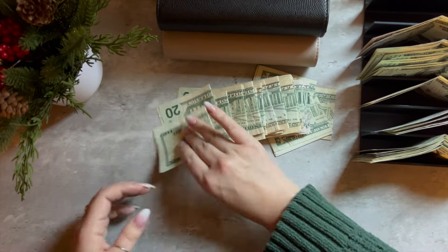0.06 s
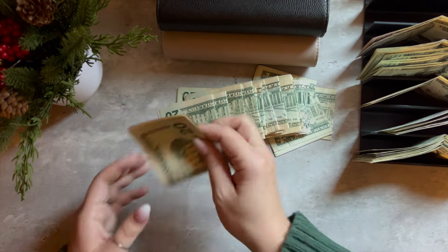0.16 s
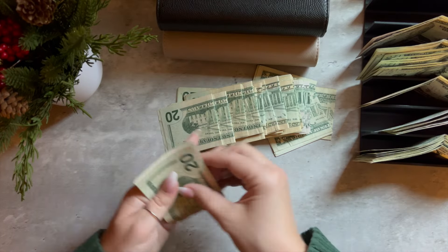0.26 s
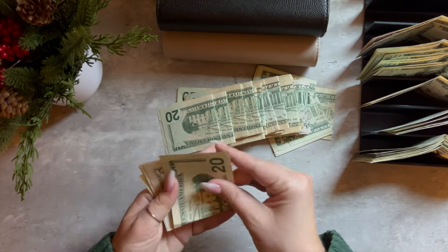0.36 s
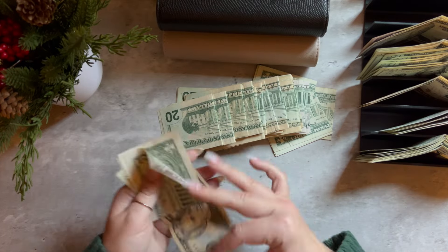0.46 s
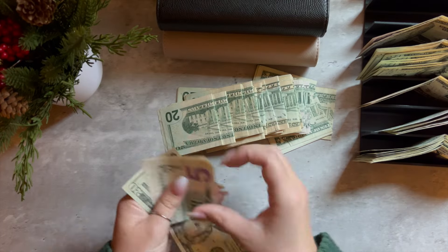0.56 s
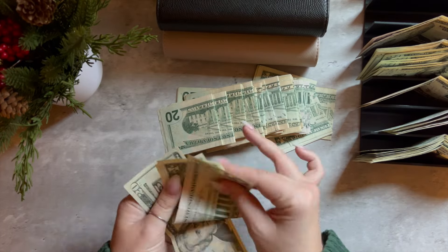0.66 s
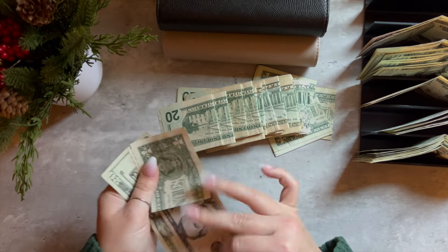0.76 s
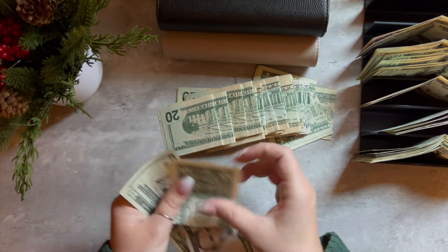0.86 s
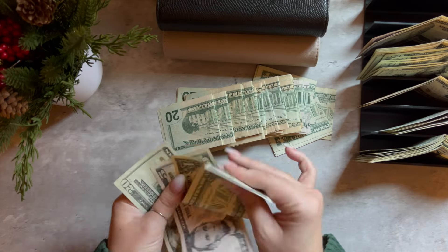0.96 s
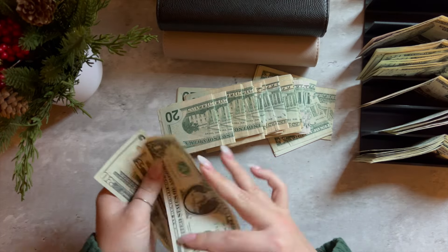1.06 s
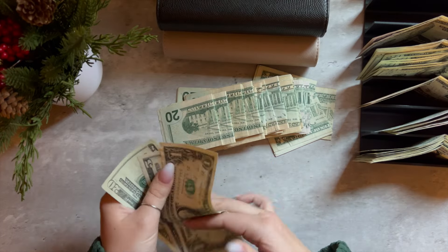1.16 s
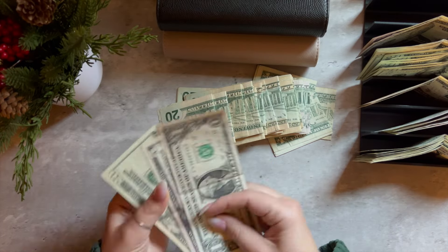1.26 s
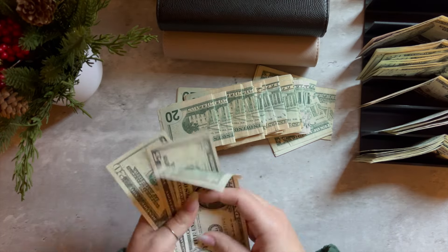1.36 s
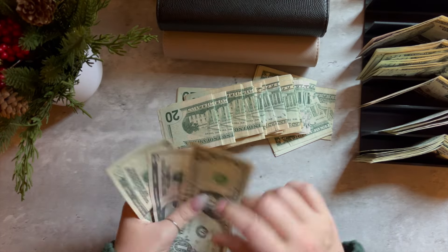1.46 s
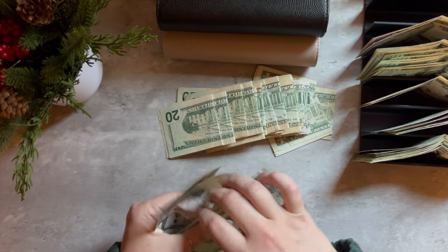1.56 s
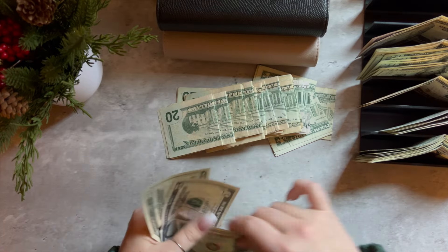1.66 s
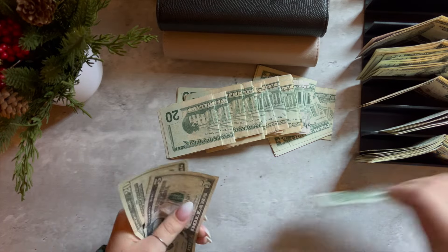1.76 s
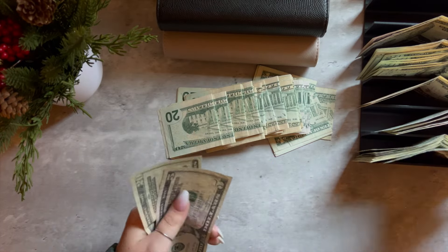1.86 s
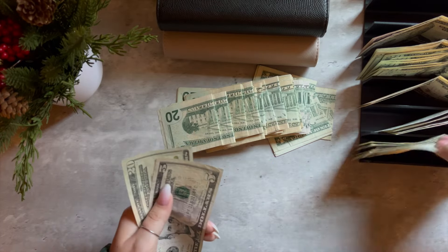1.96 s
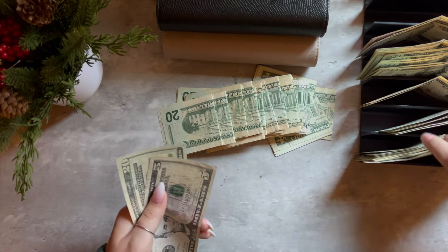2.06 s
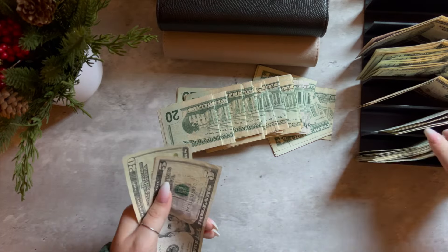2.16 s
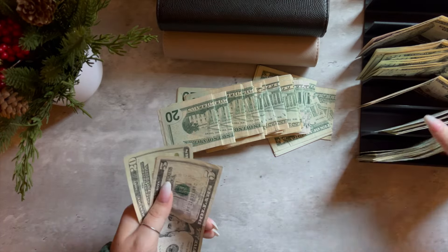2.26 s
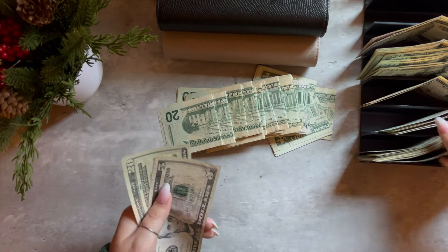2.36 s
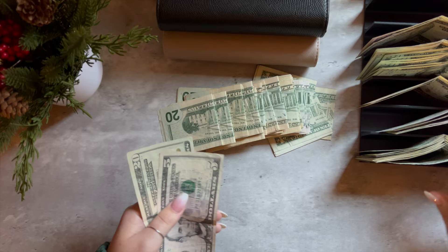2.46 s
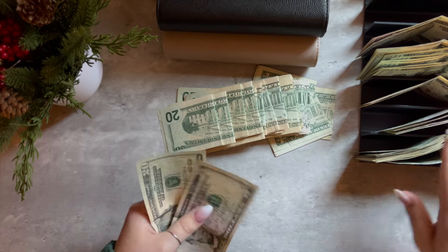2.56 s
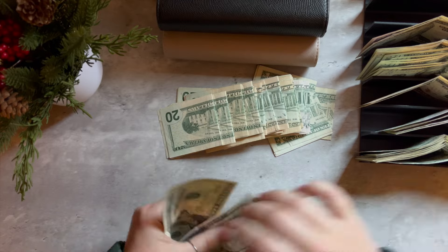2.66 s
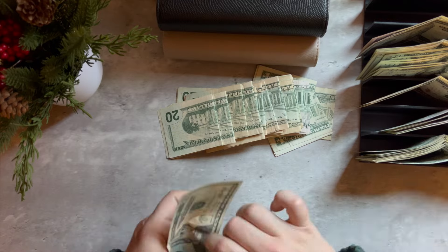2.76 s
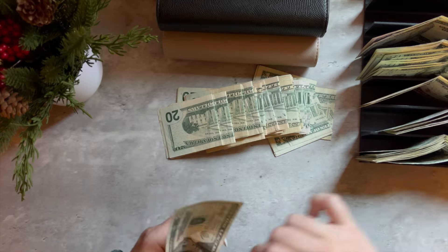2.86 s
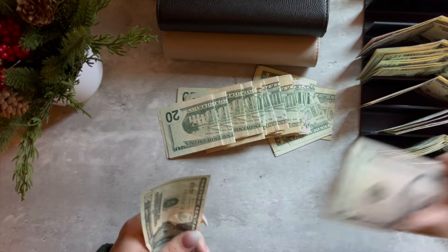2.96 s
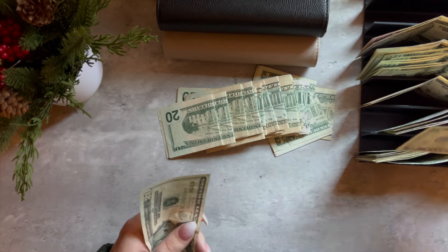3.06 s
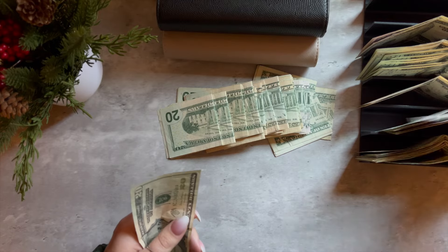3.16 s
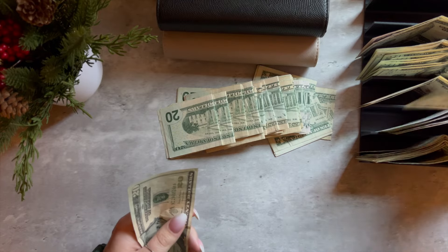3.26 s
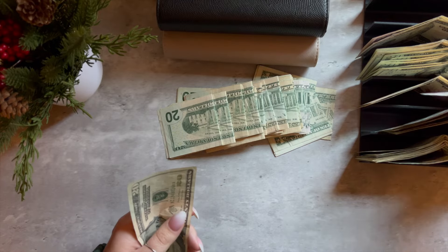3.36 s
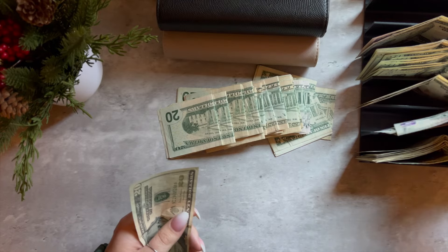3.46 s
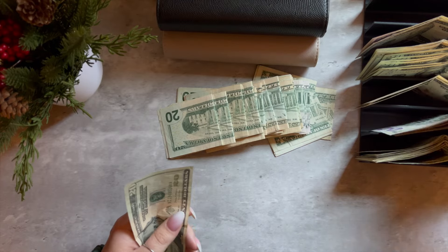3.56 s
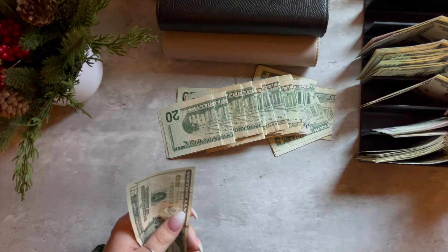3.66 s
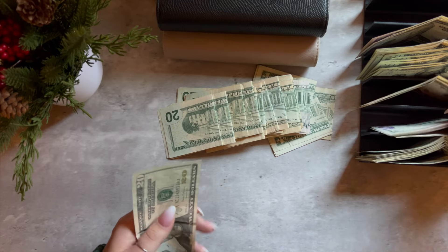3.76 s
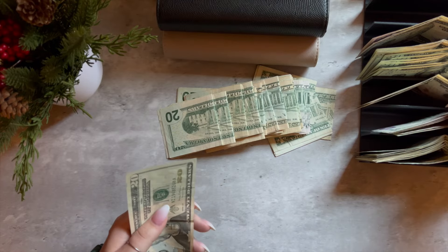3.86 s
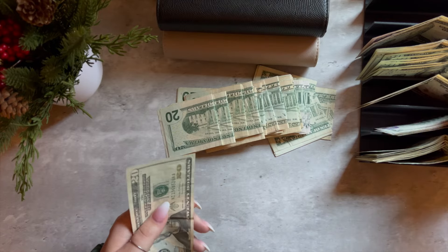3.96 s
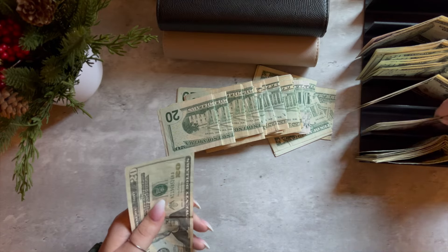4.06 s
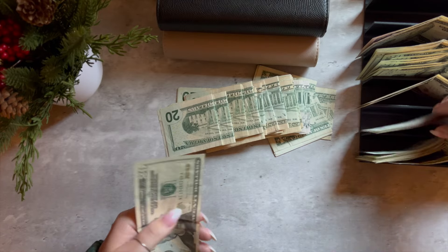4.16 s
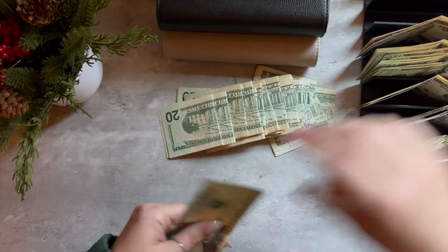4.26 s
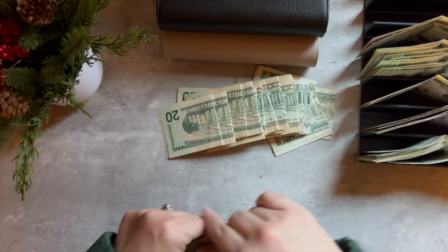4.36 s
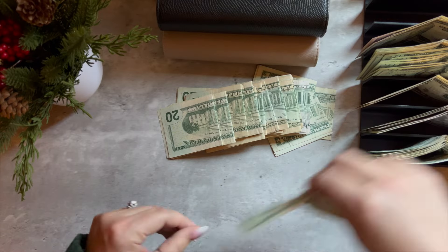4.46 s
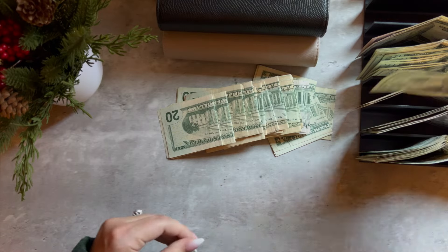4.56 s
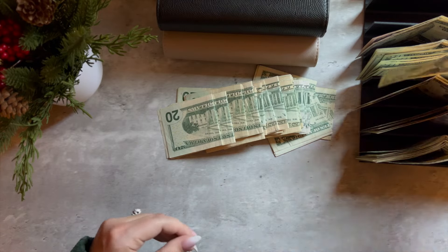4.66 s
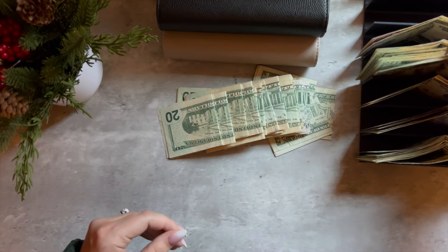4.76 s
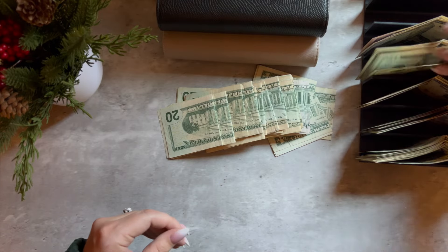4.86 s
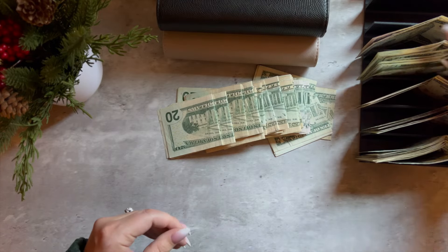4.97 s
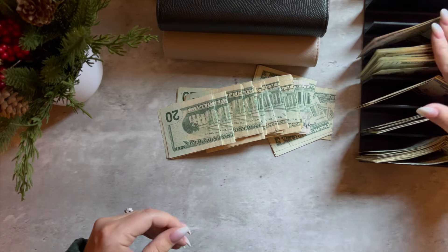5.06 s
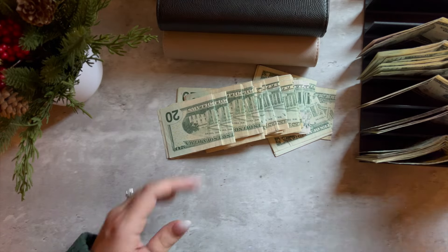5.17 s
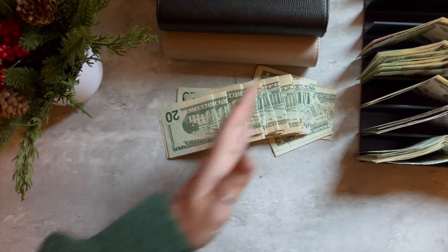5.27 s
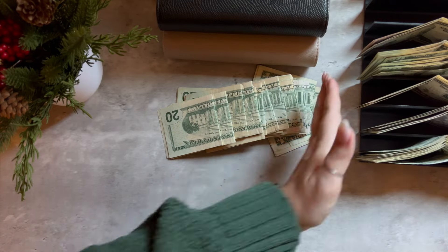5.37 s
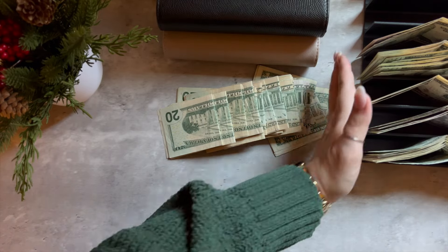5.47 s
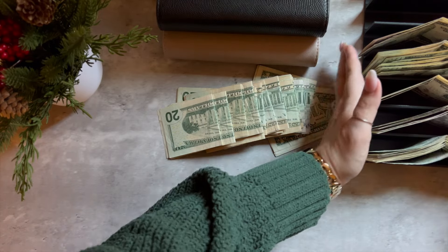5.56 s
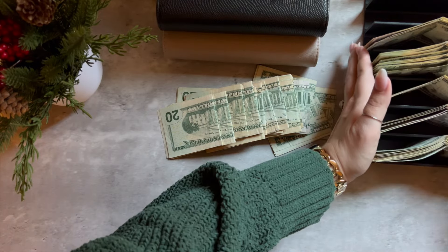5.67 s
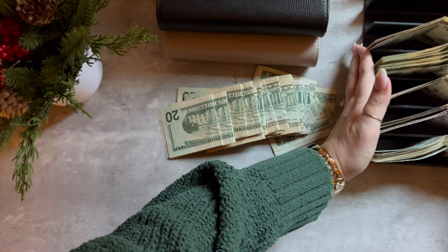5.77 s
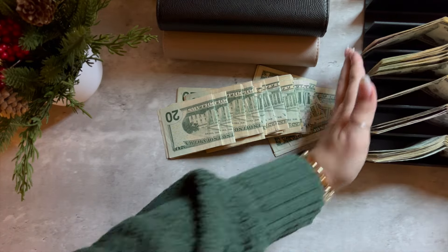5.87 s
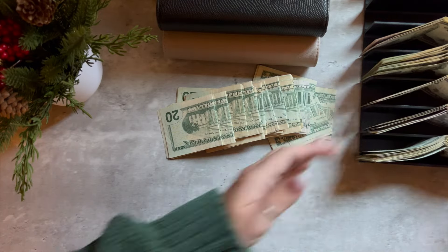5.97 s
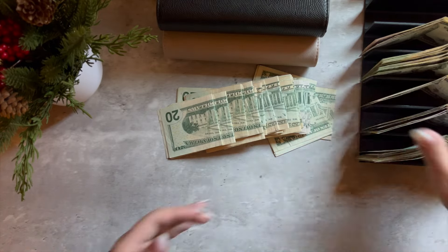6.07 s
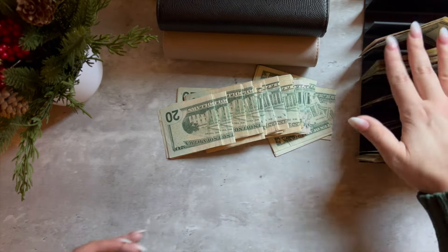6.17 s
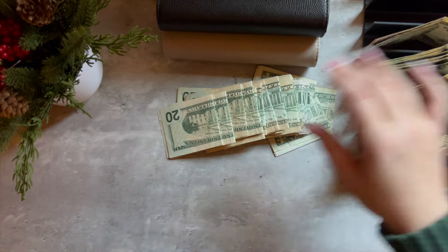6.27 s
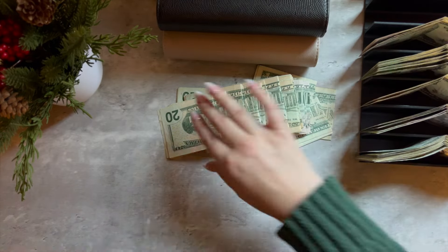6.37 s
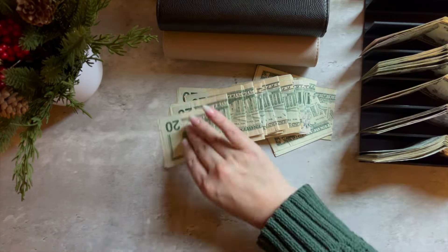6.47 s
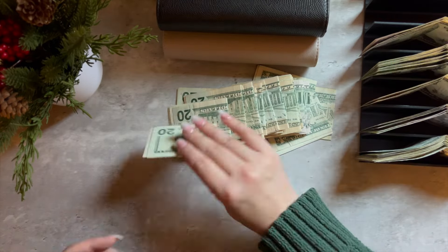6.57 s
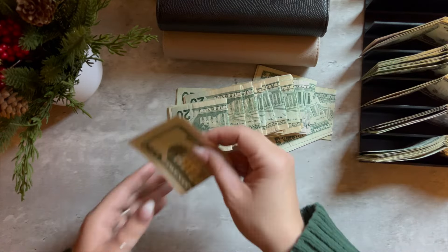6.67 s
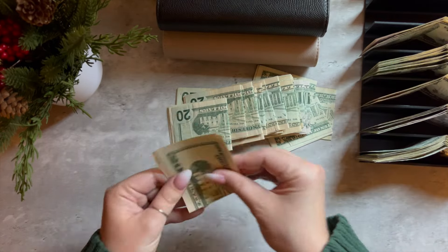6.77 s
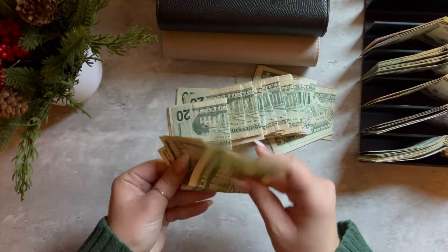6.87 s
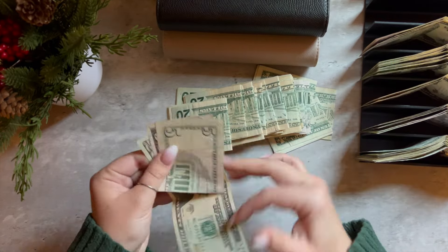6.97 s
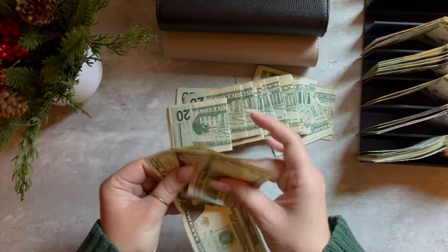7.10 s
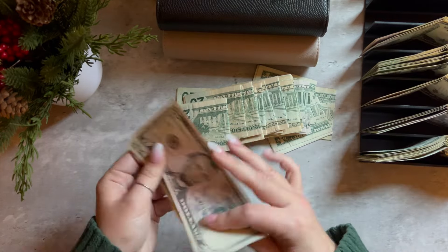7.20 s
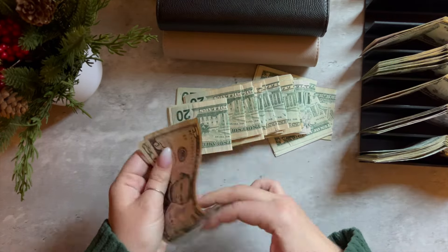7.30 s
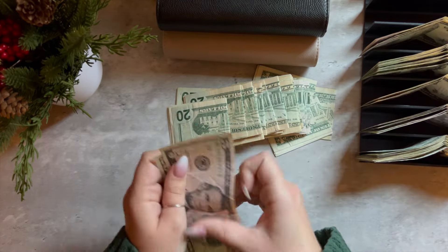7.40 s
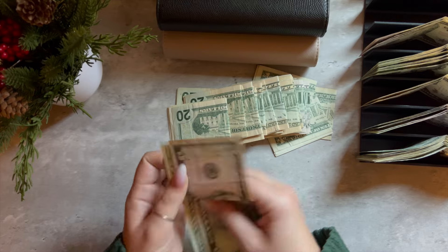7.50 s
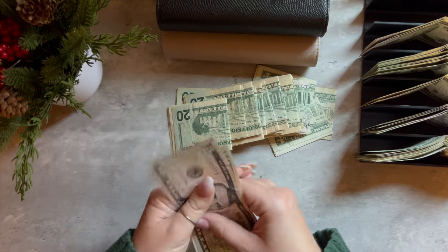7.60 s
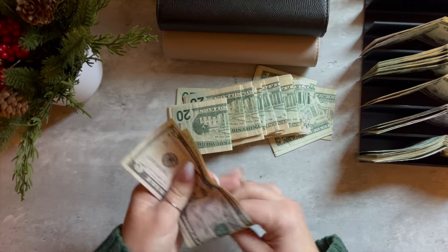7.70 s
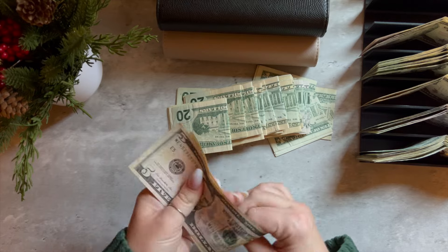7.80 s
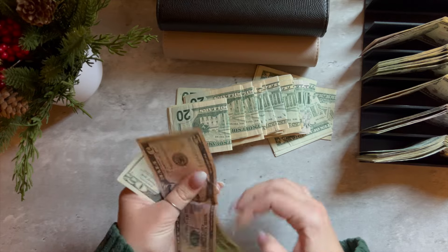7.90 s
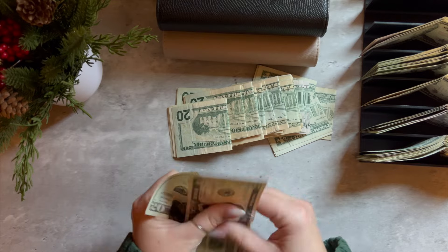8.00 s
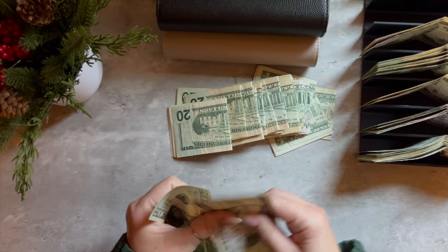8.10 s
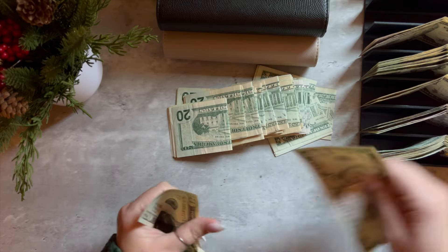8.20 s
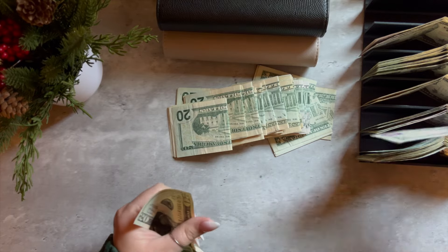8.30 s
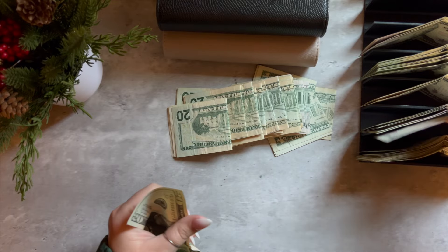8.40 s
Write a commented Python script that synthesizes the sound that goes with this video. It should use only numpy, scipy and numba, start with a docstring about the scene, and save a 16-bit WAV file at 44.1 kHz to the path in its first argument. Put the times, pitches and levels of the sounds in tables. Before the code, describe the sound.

Paper banknotes are unfolded, flattened and sorted by hand on a table, close to a stereo microphone in a small dry room. A faint, steady fan-like hum fills the bass throughout. From the start to about 3 seconds, bills slide over each other with a grainy rustle and tiny crackles while creases buckle with sharp snaps, the strongest near 1.1 seconds. Fingers and notes knock softly around 1.6, 2.5 and 2.7 seconds. From 3 to about 6.7 seconds the handling is quieter, with light papery brushes and isolated snaps near 3.6, 4.4 and 6.2 seconds, the last with a soft knock. At 6.8 seconds a dense run of loud, crisp snaps and firm sliding strokes begins, with another soft knock at 8 seconds, easing off at about 8.3 seconds.

```python
"""Paper banknotes unfolded, flattened and sorted by hand on a table, close under a stereo microphone.
A fan-like hum fills the bass from the start. To 3 s, creases buckle with sharp snaps while sheets
slide with a grainy rustle and shed small crackles; fingers and notes knock softly now and then.
Lighter brushes and fewer snaps follow; from 6.8 s, a last run of loud snaps and firm strokes.
A short echo and a small dry room trail the rustle and snaps."""
import sys
import numpy as np
from scipy import signal
from scipy.fft import rfft, irfft, next_fast_len
from scipy.io import wavfile
from scipy.ndimage import uniform_filter1d
from numba import njit

SR = 44100
rng = np.random.default_rng(int(sys.argv[2]) if len(sys.argv) > 2 else 0)


def to_wav(s):
    """Save 16-bit WAV."""
    ch = np.atleast_2d(s).T  # columns
    pcm = np.round(np.clip(ch, -1, 1) * 32767)  # PCM
    wavfile.write(sys.argv[1], SR, pcm.astype(np.int16))


N = 372204

# Air rumble spectrum: freq_hz, gain_db
HUM_SPECTRUM = [(13, -63.5), (22, -45), (142, 3.5), (203, -7), (372, -6.5), (427, -15), (562, -18),
                (645, -26), (803, -13.5), (1730, -27), (3090, -35), (4300, -36), (5200, -46.5),
                (12200, -50.5), (15600, -56.5)]
# Room resonances in the hum: centre_hz, width_hz, gain_db
ROOM_MODES = [(94, 68, 4.5), (154.6, 6.8, 9), (230, 45, 4.5), (590, 180, 14.5)]
# Stereo width of the hum: freq_hz, side_re_mid_db
HUM_WIDTH = [(60, -13), (110, -39), (200, -26.5), (380, -21), (700, -12), (1290, -1), (2380, 0.5),
             (4400, -36.5), (8120, -6), (15000, 11)]
# Phase between the microphone ports: freq_hz, left_lead_rad
PORT_PHASE = [(1100, 0.), (1600, -0.99), (2400, -0.13), (9000, 0.47), (12500, -1.2), (15000, 0.81)]
# Hard surface near the hands: delay_s, gain_db
ECHOES = [(.0042, -11)]
# Knocks of fingers and folded notes: start_s, level_db, pitch_hz
KNOCKS = [(1.556, -30, 533), (2.523, -34, 328), (2.692, -35, 535), (6.163, -39, 272), (7.172, -52, 459),
          (8.02, -41, 540)]
# Paper colour, applied after the stroke and snap levels: freq_hz, gain_db
PAPER_EQ = [(150, -43), (250, 8), (682, -3), (797, 4), (931, -2), (1270, 1.5), (2250, -5), (2820, -6.5),
            (3290, -5.5), (5070, -4.5), (9130, -6), (11800, -2.5), (15600, -7)]
# Stereo width of the paper: freq_hz, side_re_mid_db
PAPER_WIDTH = [(60, -22), (110, -29.5), (200, -13.5), (380, -28.5), (700, -16.5), (1290, -8), (2380, -17.5),
               (4400, -9), (8120, -8.5), (15000, -2)]
# Hollow below the silky band of sliding: freq_hz, gain_db
RUSTLE_EQ = [(2400, -2.5), (3000, -3), (4000, -0.5), (4800, 2), (7000, -0.5)]
# Sheet sliding on sheet: start_s, hold_s, level_db, friction_hz, flap_gain_db, top_gain_db
STROKES = [(0.03, 0.02, -56, 3740, -3, -1), (0.086, 0.044, -59.5, 7750, -5, 10.5),
           (0.221, 0.047, -62, 3800.0, 2, 10), (0.335, 0.025, -50, 5540, -1.5, 4.5),
           (0.39, 0.032, -46.0, 3830, -11, 3), (0.417, 0.078, -48, 3200.0, 4.5, 7.5),
           (0.63, 0.071, -49, 5300, -3, 6.5), (0.751, 0.036, -48.5, 4600.0, 7.5, 8),
           (0.9, 0.018, -54.5, 4700, 9, 16), (0.952, 0.03, -44, 6300, 0.5, 8),
           (1.081, 0.034, -41.0, 1900.0, 2, 1.5), (1.213, 0.075, -60, 6560, 7, 9),
           (1.376, 0.013, -47, 5470, 7.5, 4), (1.448, 0.055, -47, 6500.0, 3, 6.5),
           (1.573, 0.019, -41.5, 5500.0, -1.5, 0), (1.613, 0.044, -52, 5500, -0.5, 3),
           (1.672, 0.025, -43, 4930, 2.5, 5), (1.862, 0.089, -65.5, 2700, 11, 8.5),
           (1.995, 0.029, -51, 2660, 4.5, 0), (2.153, 0.055, -64.5, 4500, 11.5, 5),
           (2.254, 0.021, -54, 6540, -1, 0), (2.368, 0.044, -61.5, 6500.0, 5.5, 10),
           (2.415, 0.03, -58.5, 4970, 3, 2), (2.536, 0.039, -48, 2680, -4.0, 3.5),
           (2.688, 0.029, -48, 2300.0, 6, 7), (2.735, 0.12, -47, 5300, -1.0, 0.5),
           (2.873, 0.074, -50.5, 5500.0, 0.0, 6), (3.013, 0.042, -55.5, 7900, -3.0, 5.5),
           (3.228, 0.028, -61, 2300.0, 8.0, 2), (3.468, 0.013, -60, 2680, 17.5, 11.5),
           (3.632, 0.045, -56.5, 5500.0, -10, 6.5), (3.716, 0.12, -63, 2670, -6, 3),
           (3.912, 0.033, -68.5, 2700.0, -10, -18), (3.994, 0.073, -66.5, 4340, 1, 6),
           (4.136, 0.06, -61.5, 5500.0, 2, 4), (4.22, 0.099, -68.5, 6500.0, 7, 14),
           (4.38, 0.062, -54, 1890, 11, 5), (4.419, 0.062, -52, 1850, -3.5, 2),
           (4.852, 0.026, -60, 2650, 5, 6.5), (4.904, 0.036, -67, 5300, 6, 10),
           (5.09, 0.015, -62, 4500, 2, -2), (5.236, 0.068, -62, 2190, 3, -9),
           (5.364, 0.13, -72.5, 1900.0, -2, 1.5), (5.568, 0.047, -65, 2700.0, -4, 2),
           (5.648, 0.03, -66, 2720, -5, 4.5), (5.788, 0.039, -72, 2750, -12, 8),
           (5.964, 0.095, -63.5, 2230, 3, -4.5), (6.18, 0.0081, -51.5, 6730, 2, 3),
           (6.436, 0.068, -64, 7800.0, -1, 4.0), (6.555, 0.015, -65, 7800.0, -9, 9.5),
           (6.683, 0.044, -66.5, 3200.0, 12, 13.5), (6.79, 0.03, -57.5, 5000, 0, 2),
           (6.822, 0.048, -42, 7700, -17, 1.5), (6.916, 0.016, -40.5, 4730, 3, -5),
           (6.99, 0.077, -52, 1900.0, 6.5, 5), (7.109, 0.019, -43.5, 7660, -10.5, 5.5),
           (7.174, 0.039, -47, 6500.0, 13.5, 10), (7.299, 0.016, -53, 6500.0, 9.5, 11),
           (7.395, 0.018, -51.5, 3880, 10, 10), (7.474, 0.055, -50.5, 5500.0, 4.5, 9.5),
           (7.671, 0.037, -45.5, 4640, 4.5, 13), (7.763, 0.068, -56, 5500.0, -2.0, 4),
           (7.847, 0.082, -47, 5370, -1.0, 6), (8.006, 0.024, -44, 4600.0, 1, 6),
           (8.084, 0.024, -42.5, 4660, 8, 8), (8.178, 0.015, -57, 4560, 1, -10),
           (8.263, 0.049, -63.5, 7650, -4.0, 2)]
# Buckling creases: start_s, level_db, ring_hz, flap_gain_db, flap_hz, top_gain_db
SNAPS = [(0.0176, -34.5, 3920, -5.5, 2420, -8), (0.2548, -47, 4100, -1.5, 600, -3),
         (0.3967, -28.5, 6470, -14.5, 1120, -3), (0.4531, -30.5, 3500, -4, 2190, -15),
         (0.4645, -29.5, 4400, -6.3, 2180, 0), (0.4934, -40, 6840, -12, 1700, 17),
         (.7405, -35.5, 5950, -29, 2470, 7.5), (.7734, -32.5, 5000, -18, 2010, 7),
         (0.9031, -44, 4600, 2, 1540, -4), (1.0318, -39.5, 5600, -14.5, 1650, 4),
         (1.0738, -31.5, 4500, -3.5, 1550, -6), (1.081, -20.5, 4640, -10, 1080, -3.5),
         (1.114, -52.5, 4200, 8.5, 1460, -7), (1.1401, -34, 5650, -8.5, 784, 4.5),
         (1.196, -39.5, 2570, -0.5, 1810, -2), (1.2715, -43.5, 4530, -8, 1470, -1),
         (1.318, -47, 4200, -7, 1390, 0), (1.374, -40, 4100, -3, 1190, -18),
         (1.4234, -40, 5660, -8.5, 780, 2), (1.478, -37.5, 6140, -1.5, 1710, 1),
         (1.5177, -41.5, 4870, 4, 1580, -18), (1.5565, -43, 5200, 9, 590, -11),
         (1.5718, -37, 6230, -0.5, 1700, -10), (1.594, -37.5, 7100, -22, 2060, 8.5),
         (1.634, -41, 4900, -14, 1230, -19), (1.6834, -36, 2560, -4, 1540, -6),
         (1.7176, -37, 4900, 0, 1020, 2), (1.9946, -47.5, 2600, 3.5, 600, -29),
         (2.04, -60, 2650, 15, 2500, -18), (2.186, -50, 3700, -10, 1340, 1),
         (2.2324, -37.5, 3500, -23, 1160, -19), (2.2666, -41, 7000, -21, 880, -2.5),
         (2.3619, -44, 2500, -7.5, 1300, -11), (2.5213, -35, 6900, -12, 2570, 3.5),
         (2.5277, -31.5, 7900, 1, 2600, -9), (2.593, -42.5, 5930, -10, 2410, 3),
         (2.684, -35, 5600, 2, 2180, 1), (2.6915, -44.5, 5950, 2, 1610, -14),
         (2.7557, -51, 5000, 8.5, 1840, 1), (2.7817, -40.5, 5200, -9, 2120, -15),
         (2.9, -44, 6400, 6, 1760, -11), (2.9162, -38.5, 4630, -8, 1290, -11),
         (2.9289, -34.5, 8400, -10, 824, -9), (2.9797, -42, 2600, -5, 830, 5),
         (3.034, -45.5, 8300, -6, 784, 0.5), (3.231, -65, 2550, 17, 2350, -18),
         (3.438, -52.5, 4000, 8, 2370, 0), (3.447, -49.5, 2600, 0, 1030, -6.5),
         (3.6428, -36, 5600, -16, 1240, 1), (3.7643, -51, 6280, -7, 2270, 6),
         (3.9112, -60.5, 3100, -9, 600, -23), (4.1735, -49, 4500, -2.5, 610, 0),
         (4.223, -50, 6400, -4, 600, -12), (4.259, -43.5, 6530, -11.5, 1010, 6.5),
         (4.289, -54.5, 2600, 8, 1870, 4), (4.375, -34, 5500, 1, 2030, -7),
         (4.4352, -45.5, 4630, -1, 1500, 13), (4.4773, -53.5, 4800, 14, 1290, -3),
         (4.519, -54.5, 4040, -1, 2010, -6), (4.858, -53, 2700, 0, 1777, -3),
         (5.078, -41, 4370, -11.5, 2064, -18), (6.161, -34.5, 4530, -9.5, 1266, 5),
         (6.471, -50, 7500, -4.5, 2000, -8), (6.8446, -21.5, 6600, -7.5, 2350, -5),
         (6.8984, -41.5, 5100, -5, 1120, -12), (6.9277, -23.5, 5450, -2.5, 2100, 1),
         (6.9454, -36, 6000, -0.5, 806, 8), (6.955, -29.5, 5130, -10, 1360, 9),
         (7.082, -43.5, 4900, 1, 1830, -20), (7.1714, -23, 6700, -19, 820, 1),
         (7.1999, -22.5, 5800, -34, 1130, -17), (7.2164, -24, 7300, -9, 2070, -9),
         (7.3039, -30.5, 6800, -12.5, 940, -2), (7.363, -51, 2500, 2, 1500, -15),
         (7.4755, -31.5, 4300, -14, 675, -17), (7.5227, -38.5, 6250, -2.5, 790, 4),
         (7.6136, -31, 6200, -7.5, 1380, 0), (7.665, -29.5, 5100, -5.5, 1650, -1),
         (7.704, -40, 4500, -21, 1320, 11), (7.7554, -33, 5450, -22, 830, -9),
         (7.79, -38.5, 3700, -4.5, 1480, -10), (7.826, -34.5, 5400, -1.5, 2270, 0),
         (7.8613, -30, 8300, -9.5, 1040, -1), (7.8714, -36, 5300, -18, 1980, 4),
         (7.9984, -32, 4300, -13, 1680, -7), (8.0092, -38, 4630, 1, 1730, -2),
         (8.0169, -23.5, 6030, -7, 850, 4.5), (8.0992, -35.5, 5070, -20, 1530, -11),
         (8.1809, -49.5, 5270, 0.5, 600, -1)]

HUM_RMS_DB = -49.4
ROOM_T60_S, ROOM_DB = 0.032, -13
FLAP_BAND_HZ, BODY_BAND_HZ, TOP_BAND_HZ = (450, 2500), (2500, 8000), (8000, 19000)
RISE_DB_PER_S, FALL_DB_PER_S = 599, 447
SHIFT_DB, GATHER_DB_PER_S, SETTLE_DB_PER_S = -6, 258, 194.5   # sheets shift softly around each stroke
FRICTION_WIDTH_HZ, RASP_HZ, RASP_WIDTH_HZ, RASP_DB = 1000, 2710, 290, 9.5
SNAP_RISE_S, CRACK_T60_S, SHIVER_T60_S = 0.00023, 0.006, 0.032
CUTOFF_HZ = 16500


def from_db(db):
    return 10 ** (np.asarray(db) / 20)


def unit_rms(x):
    return x / np.sqrt(np.mean(x ** 2) + 1e-20)


def at_hz(curve, hz):
    """Curve value, interpolated over log frequency."""
    freq_hz, values = np.transpose(curve)
    return np.interp(np.log(hz), np.log(freq_hz), values)


def drift(rate_hz):
    """Slow random motion: noise through a double one-pole low-pass, rms 1."""
    r = np.exp(-2 * np.pi * rate_hz / SR)
    return unit_rms(signal.lfilter([1], [1, -2 * r, r * r], rng.standard_normal(N + SR))[SR:])


def resonance(x, hz, width_hz):
    """Two-pole band-pass, peak gain 1."""
    r = np.exp(-np.pi * width_hz / SR)
    feedback = 2 * r * np.cos(2 * np.pi * hz / SR)
    return signal.lfilter([(1 - r * r) / 2, 0, (r * r - 1) / 2], [1, -feedback, r * r], x)


@njit
def gliding_resonance(x, hz, width_hz):
    """Two-pole band-pass, one centre per sample."""
    r = np.exp(-np.pi * width_hz / SR)
    feedback = 2 * r * np.cos(2 * np.pi * hz / SR)
    y = np.zeros_like(x)
    for i in range(2, len(x)):
        y[i] = (1 - r * r) / 2 * (x[i] - x[i - 2]) + feedback[i] * y[i - 1] - r * r * y[i - 2]
    return y


def three_bands(flap, body, top):
    """Sum of three band-passed signals; unit white noise gives about rms 1 per band."""
    out = 0
    for x, (low_hz, high_hz) in [(flap, FLAP_BAND_HZ), (-body, BODY_BAND_HZ), (top, TOP_BAND_HZ)]:
        band = signal.butter(2, [low_hz, high_hz], "band", fs=SR, output="sos")
        out = out + signal.sosfilt(band, x) * np.sqrt(SR / 2 / (high_hz - low_hz))
    return out


def stereo_image(mid_side, gain_db_at, width_curve):
    """Coloured mid and side to left and right; the microphone ports shift the phase of the mid."""
    size = next_fast_len(N + SR)
    hz = np.maximum(np.arange(size // 2 + 1) * SR / size, 1)
    mid, side = rfft(mid_side, size) * from_db(gain_db_at(hz))
    side *= from_db(at_hz(width_curve, hz))
    turn = np.exp(0.5j * at_hz(PORT_PHASE, hz))
    return irfft([mid * turn + side, mid / turn - side], size)[:, :N]


def hum():
    """Steady rumble of moving air, lifted at a few room resonances."""
    def spectrum_db(hz):
        modes_db = sum(gain_db / (1 + ((hz - centre_hz) / (width_hz / 2)) ** 2)
                       for centre_hz, width_hz, gain_db in ROOM_MODES)
        return at_hz(HUM_SPECTRUM, hz) + modes_db
    air = stereo_image(rng.standard_normal((2, N)), spectrum_db, HUM_WIDTH)
    return from_db(HUM_RMS_DB) * unit_rms(air)


def room(x):
    """Direct sound, early echo, diffuse tail of decaying noise."""
    t = np.arange(SR // 3) / SR
    tail = rng.standard_normal((2, len(t))) * from_db(-60 * t / ROOM_T60_S) * np.minimum(t / 0.004, 1)
    response = from_db(ROOM_DB) * tail / np.sqrt(np.sum(tail ** 2, axis=1, keepdims=True))
    response[:, 0] = 1
    for delay_s, gain_db in ECHOES:
        response[:, round(delay_s * SR)] += from_db(gain_db)
    return signal.fftconvolve(x, response, axes=1)[:, :N]


def knocks(rise_s=0.0022, t60_s=0.044):
    """Each soft contact rings a few cycles of one low mode."""
    t = np.arange(SR // 10) / SR
    out = np.zeros(N)
    for start_s, level_db, pitch_hz in KNOCKS:
        envelope = from_db(level_db - 60 * t / t60_s) * np.minimum(t / rise_s, 1)
        i = round(start_s * SR)
        out[i:i + len(t)] += envelope * np.sin(2 * np.pi * pitch_hz * t)
    return out


def crackles(rate_per_s, t60_s=0.006):
    """Tiny creases give way at random, uneven in size, each ringing one of 8 patches; rms 1."""
    onsets = rng.random(N) < rate_per_s / SR
    sizes = onsets * from_db(4.5 * np.minimum(rng.exponential(1, N), 4))
    patch = rng.integers(0, 8, N)
    decay = from_db(-60 / (t60_s * SR))
    noise = rng.standard_normal((2, N))
    out = np.zeros((2, N))
    for k, pitch_hz in enumerate(np.geomspace(1100, 13000, 8)):
        envelope = signal.lfilter([1], [1, -decay], sizes * (patch == k) + 1e-18)
        out += resonance(noise * envelope, pitch_hz, width_hz=0.11 * pitch_hz)
    return unit_rms(out)


def stroke_curves():
    """Strokes swell, hold and die; powers add, the strongest set the colour."""
    t = np.arange(0, N, 32) / SR
    start_s, hold_s, level_db, *colour = np.transpose(STROKES)[:, :, None]
    before_s = np.maximum(start_s - t, 0)
    after_s = np.maximum(t - start_s - hold_s, 0)
    slide = from_db(level_db - RISE_DB_PER_S * before_s - FALL_DB_PER_S * after_s)
    shift = from_db(level_db + SHIFT_DB - GATHER_DB_PER_S * before_s - SETTLE_DB_PER_S * after_s)
    power = slide ** 2 + shift ** 2
    total_db = 10 * np.log10(power.sum(axis=0))
    weight = power ** 2
    blended = [(weight * column).sum(axis=0) / weight.sum(axis=0) for column in colour]
    return [np.interp(np.arange(N) / SR, t, curve) for curve in [total_db, *blended]]


def rustle():
    """Sliding sheets: fluttering hiss and a friction resonance. Firm strokes crackle, light ones rasp."""
    level_db, friction_hz, flap_gain_db, top_gain_db = stroke_curves()
    firmness = np.clip((level_db + 72.5) / 18, 0.25, 1)
    flutter = from_db(firmness * (3.5 * drift(rate_hz=23) + 2.2 * drift(rate_hz=110)))
    hiss = from_db(level_db - 5.5 + 3.9 * firmness) * unit_rms(flutter * rng.standard_normal((2, N)))
    crackle = firmness * from_db(level_db - 7.5) * crackles(rate_per_s=260 * flutter)
    sheet = from_db(-1) * hiss + crackle
    friction = np.array([gliding_resonance(channel, friction_hz, FRICTION_WIDTH_HZ) for channel in hiss])
    rasp = from_db(RASP_DB) * resonance(sheet, RASP_HZ, RASP_WIDTH_HZ)
    swish = from_db(6 - 7 * firmness) * friction + (1 - firmness) * rasp
    bands = three_bands(sheet * from_db(flap_gain_db) + swish, sheet + swish, sheet * from_db(top_gain_db))
    size = next_fast_len(N)
    hz = np.arange(1, size // 2 + 2) * SR / size
    return irfft(rfft(bands, size) * from_db(at_hz(RUSTLE_EQ, hz)), size)[:, :N]


def snaps():
    """A crease flips: a crack and a weaker shiver ring the taut patch and, lower, the sheet's flap."""
    length, onset_samples = SR // 20, round(0.006 * SR)
    t = np.arange(length) / SR
    crack = from_db(-60 * t / CRACK_T60_S)
    shiver = from_db(-2.5 - 60 * t / SHIVER_T60_S)
    envelope = (crack + shiver) * np.minimum(t / SNAP_RISE_S, 1)
    noise = rng.standard_normal((len(SNAPS), 2, length))
    # the snap tears on unevenly, in 1 ms steps
    ragged_db = 3 * np.repeat(rng.standard_normal((len(SNAPS), 1, 50)), 45, axis=2)[:, :, :length]
    noise *= from_db(uniform_filter1d(ragged_db, size=15, axis=2))
    noise[:, 0, 12:16] += 1.25 * np.array([1, 1, -1, -1])   # opening spike, mid only
    bands = np.zeros((3, 2, N + length))
    for snap, burst in zip(SNAPS, noise * envelope):
        start_s, level_db, ring_hz, flap_gain_db, flap_hz, top_gain_db = snap
        body = burst - from_db(13.5) * resonance(burst, ring_hz, width_hz=830)
        flap = from_db(-6.5) * burst + from_db(8.5) * resonance(burst, flap_hz, width_hz=350)
        onset_rms = np.sqrt(np.mean(body[:, :onset_samples] ** 2, axis=1, keepdims=True))
        parts = np.array([from_db(flap_gain_db) * flap, body, from_db(top_gain_db) * burst])
        i = round(start_s * SR)
        bands[:, :, i:i + length] += from_db(level_db) / onset_rms * parts
    return three_bands(*bands[:, :, :N])


def scene():
    """Paper in the room, over knocks and hum."""
    mid_side = room(rustle() + snaps())
    paper = stereo_image(mid_side, lambda hz: at_hz(PAPER_EQ, hz), PAPER_WIDTH)
    return paper + knocks() + hum()


def record(dry):
    """Steep low-pass."""
    return signal.sosfilt(signal.cheby2(14, 60, CUTOFF_HZ, fs=SR, output="sos"), dry)


dry = scene()
out = record(dry)
to_wav(out)
```